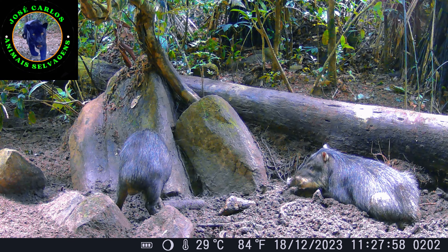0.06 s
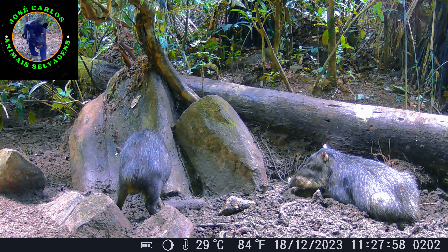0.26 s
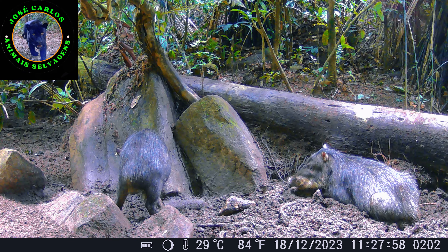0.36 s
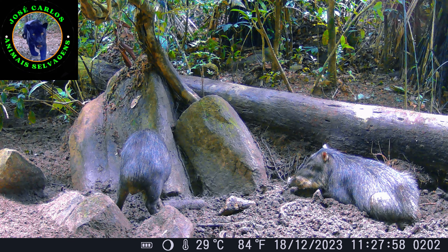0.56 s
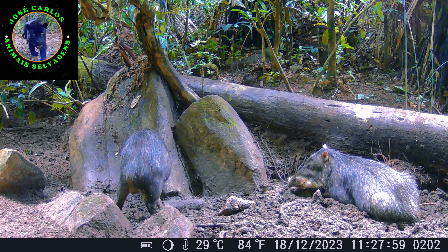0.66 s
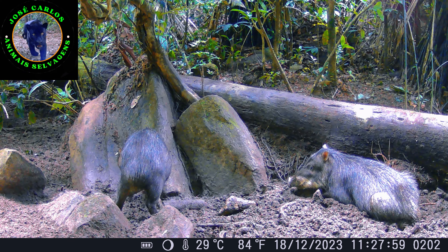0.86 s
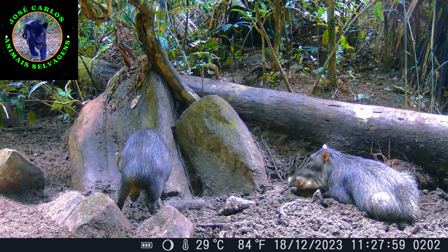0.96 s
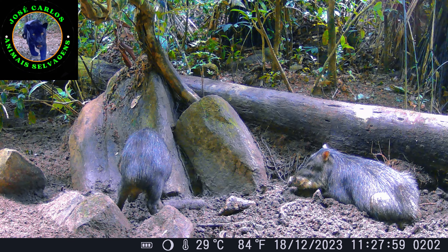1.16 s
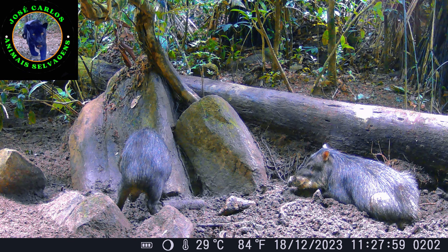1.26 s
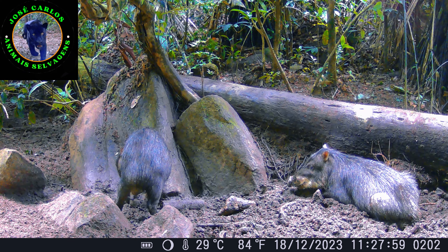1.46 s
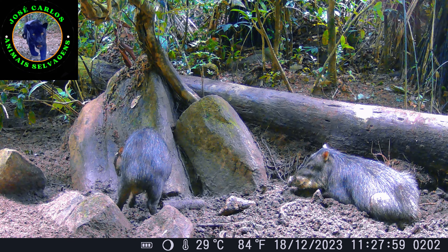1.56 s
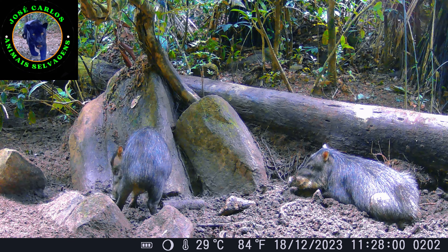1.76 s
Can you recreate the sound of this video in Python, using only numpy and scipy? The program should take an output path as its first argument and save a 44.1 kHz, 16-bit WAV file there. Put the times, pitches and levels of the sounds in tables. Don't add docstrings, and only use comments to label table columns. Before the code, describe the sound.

Peccary tusk clacks: a lighter one at 0.12 s, then a hard, hollow, briefly overloaded one at 0.17 s, scattered by trees into a fading echo. Leaf litter rustles faintly in the first 0.1 s. Low pulsing grunts and wet smacks continue, strongest smack near 1.19 s, more around 1.7. A bird's falling whistle repeats at 0.05, 0.63, 1.17 and 1.75 s, growing stronger, over faint pulsing insects and distant forest wash.

```python
import sys
import numpy as np
from scipy import signal
from scipy.fft import rfft, irfft
from scipy.io import wavfile
from scipy.ndimage import uniform_filter1d

SR = 44100
rng = np.random.default_rng(int(sys.argv[2]) if len(sys.argv) > 2 else 0)


def field_ratio(decibels):
    return 10 ** (np.asarray(decibels, dtype=float) / 20)


def transcribe(signal):
    frames = np.atleast_2d(signal).T
    limited = np.clip(frames, -1, 1)
    pcm = np.round(limited * 32767).astype(np.int16)
    wavfile.write(sys.argv[1], SR, pcm)


N = 79380


def read(points, hz):
    f, value = np.transpose(points)
    return np.interp(np.log(hz + 1), np.log(f + 1), value)


def evened(x):
    return x / np.sqrt(np.mean(x ** 2) + 1e-20)


def add(mix, start_s, sound):
    part = mix[round(start_s * SR):][:len(sound)]
    part += sound[:len(part)]


def drift(hz, size):
    low_pass = signal.butter(2, hz, fs=SR, output="sos")
    return evened(signal.sosfiltfilt(low_pass, rng.standard_normal(size), padtype="even"))


def resonate(x, hz, width_hz):
    turn = np.exp(2j * np.pi * np.cumsum(hz * np.ones(len(x))) / SR)
    r = np.exp(-np.pi * width_hz / SR)
    return 2 * (turn * signal.lfilter([1 - r], [1, -r], x / turn)).real


def coloured(points, x):
    hz = np.fft.rfftfreq(len(x), 1 / SR)
    return irfft(rfft(x) * field_ratio(read(points, hz)), len(x))


def fading_noise():
    # f/Hz, level/dB per Hz
    early_colour = [(59, -54), (100, -15), (555, 3), (694, -7), (1050, -2.5), (6990, -22.5), (8580, -14.5),
                    (11200, -54), (18900, -120)]
    level_db, length_s = -49, 0.1
    t = np.arange(N) / SR
    fade = np.cos(np.pi / 2 * np.clip(t / length_s, 0, 1))
    return field_ratio(level_db) * fade * evened(coloured(early_colour, rng.standard_normal(N)))


def wash():
    # f/Hz, level/dB per Hz
    far_forest = [(20, 0.5), (90, -6.5), (300, -12.5), (1500, -21.5), (2100, -22), (3300, -32.5),
                  (5100, -45.5), (6500, -34.5)]
    level_db, swell_db, patchy_db = -51, .6, 1.2
    frames, hz = N // 256 + 5, np.fft.rfftfreq(1024, 1 / SR)
    a, b, patches = rng.standard_normal((frames, 513, 3)).T
    patches = uniform_filter1d(patches, size=10, axis=0)
    patches = evened(uniform_filter1d(patches, size=12, axis=1))
    z = (a + 1j * b) * field_ratio(read(far_forest, hz)[:, None] + patchy_db * patches)
    noise = signal.istft(z, nperseg=1024, noverlap=768)[1][:N]
    return field_ratio(level_db + swell_db * drift(4.35, size=N)) * evened(noise)


def insects():
    # f/Hz, width/Hz, level/dB, clicks/per s
    chorus = [(7790, 730, -67.5, 2400), (5830, 460, -77, 530)]
    first_s, every_s, length_s = .08, .29, .19
    low_hz, high_hz, width_hz, buzz_db = 4280, 4720, 450, -73.5
    part = ((np.arange(N) / SR - first_s) % every_s) / length_s
    hz = low_hz + (high_hz - low_hz) * np.sqrt(np.clip(part, 0, 1))
    on = np.clip(np.minimum(part, 1 - part) / 0.12, 0, 1)
    scrape = rng.standard_normal(N) * field_ratio(0.92 * drift(250, size=N))
    buzz = resonate(resonate(scrape, hz, width_hz), hz, width_hz)
    out = field_ratio(buzz_db) * on * evened(buzz)
    for ring_hz, ring_width, db, rate in chorus:
        clicks = (rng.random(N) < rate / SR) * rng.standard_normal(N)
        clicks = clicks * field_ratio(1.9 * drift(40, size=N))
        out += field_ratio(db) * evened(resonate(resonate(clicks, ring_hz, ring_width), ring_hz, ring_width))
    return out


def smacks():
    # t/s, peak level/dB, f/Hz, width/Hz, t60/s (time to fall by 60 dB)
    licks = [(0.023, -47, 1100, 600, .015), (.076, -49, 980, 203, .04), (0.5378, -46.5, 1430, 402, .012),
             (.541, -49, 2600, 895, .01), (0.556, -49.5, 2330, 1210, .012), (.601, -45.5, 1380, 304, 0.017),
             (0.65, -42, 1620, 1010, 0.008), (.651, -44.5, 2250, 400, 0.042), (.649, -57, 3950, 704, 0.014),
             (.6675, -41, 1000, 600, 0.016), (.668, -53, 4040, 700, 0.027), (0.74, -44.5, 1300, 400, 0.022),
             (1.084, -59, 1900, 1010, 0.0074), (1.0887, -47.5, 1970, 500, 0.018),
             (1.1135, -49, 1550, 400, .02), (1.1173, -48.5, 1730, 400, 0.01),
             (1.134, -50, 1450, 700, 0.011), (1.138, -57, 1840, 298, 0.021),
             (1.1528, -47, 1540, 395, 0.018), (1.156, -45, 1760, 397, 0.015), (1.19, -35, 1500, 810, .014),
             (1.1891, -37.5, 965, 250, 0.025), (1.193, -35.5, 1820, 403, 0.018),
             (1.1902, -52, 3170, 800, .01), (1.313, -49.5, 1240, 200, 0.037),
             (1.65, -49.5, 3100, 700, 0.029), (1.7025, -47.5, 3410, 900, 0.045),
             (1.7012, -42, 1470, 1300, 0.052), (1.7341, -40, 1540, 800, 0.036),
             (1.7374, -43, 907, 350, 0.05), (1.739, -42.5, 2430, 1000, 0.031),
             (1.753, -46.5, 1650, 500, 0.034)]
    snap, lips_rise, lips_s = 10, .2, .006
    out, t = np.zeros(N), np.arange(2205) / SR
    wet = rng.standard_normal((len(licks), len(t)))
    climb = 1 + lips_rise * (np.minimum(t / lips_s, 1) - .5)
    first_contact = snap * (np.arange(len(t)) == 10)
    for noise, (start, db, hz, width, t60) in zip(wet, licks):
        sound = noise * field_ratio(-60 * t / max(t60, .004)) * np.minimum(t / 0.00035, 1) + first_contact
        for share in (.5, 1, 2):
            sound = resonate(sound, hz * climb, share * width)
        add(out, start, field_ratio(db) * sound / abs(sound).max())
    return out


def bird():
    # start t/s, length/s, level/dB, top f/Hz
    whistles = [
        (.05, .3, -59, 2290),
        (.625, .3, -56.5, 2333),
        (1.172, .3, -54, 2382),
        (1.745, .3, -50.5, 2415),
    ]
    # f/Hz, level/dB
    voice = [(1850, -12), (1945, -11), (1990, -2), (2065, -7), (2120, -1), (2170, 3), (2215, -5),
             (2330, -5), (2450, -8)]
    rise_s, fade_share, waver_db = .03, .15, 2.4
    fall_hz_per_s, wet_db, blur_t60 = 1740, -4, .7
    out, t = np.zeros(N), np.arange(SR // 2) / SR
    waver = field_ratio(waver_db * drift(46, size=N))
    for start, length, db, top_hz in whistles:
        part = np.clip(t / length, 0, 1)
        swell = np.minimum(t / rise_s, 1) * np.clip((1 - part) / fade_share, 0, 1)
        swell = swell * field_ratio(db + read(voice, top_hz - fall_hz_per_s * t))
        turns = (top_hz - fall_hz_per_s * t / 2) * t
        add(out, start, np.sqrt(2) * swell * np.sin(2 * np.pi * turns))
    blur = rng.standard_normal(len(t)) * field_ratio(-60 * t / blur_t60)
    blurred = signal.fftconvolve(out, blur / np.linalg.norm(blur))[:N]
    return out * waver + field_ratio(wet_db) * blurred


def grunts():
    # start t/s, length/s, level/dB, pulses/per s, throat f/Hz
    calls = [(0.062, 0.061, -49, 75, 210), (0.455, 0.08, -47.5, 66, 396), (0.713, 0.048, -49.5, 140, 505),
             (0.749, 0.039, -51.5, 58, 323), (0.775, 0.029, -53, 75, 178), (0.403, 0.092, -57.5, 100, 310),
             (0.519, 0.037, -54, 71, 250), (0.903, 0.029, -59, 90, 208), (1.193, 0.032, -50.5, 85, 209),
             (1.327, 0.023, -56, 102, 205), (1.455, 0.039, -53, 80, 135), (1.694, 0.052, -48, 96, 211)]
    breath, jitter, uneven_db = .2, .07, 8.5
    throat_width, chest_hz, chest_width, snout_hz = 173, 94, 29, 626
    chest_db, chest_tilt_db = 0, -7.5
    out, size = np.zeros(N), 4410
    t = np.arange(size) / SR
    fade = np.clip((t[-1] - t) * 50, 0, 1)
    snout = signal.butter(4, snout_hz, fs=SR, output="sos")
    for start, length, db, rate_hz, throat_hz in calls:
        turns = .5 + np.cumsum(rate_hz * (1 + jitter * drift(80, size=size))) / SR
        pulses = np.diff(np.floor(turns), prepend=0) * field_ratio(uneven_db * drift(64, size=size))
        pulses = (1 - breath) * evened(pulses) + breath * rng.standard_normal(size)
        pulses *= np.sin(np.pi * np.clip(t / length, 0, 1))
        throat = resonate(resonate(pulses, throat_hz, 2 * throat_width), throat_hz, throat_width)
        throat = signal.sosfilt(snout, throat)
        chest = resonate(resonate(pulses, chest_hz, chest_width), chest_hz, 2 * chest_width)
        chest_gain = field_ratio(chest_db + chest_tilt_db * np.log2(throat_hz / 200))
        voice = evened(throat) + chest_gain * evened(chest)
        add(out, start, field_ratio(db) * np.sqrt(length * 10) * fade * voice)
    return out


def clack(modes, crack_db):
    polarity = [-1, 1, 1, -1, -1, 1, 1, -1, 1, 1, -1, 1, -1, 1, -1, -1, 1, -1, 1]
    # f/Hz, level/dB
    crack_colour = [(300, -24), (900, -13), (1700, -5), (2600, 0), (3700, -5), (4300, -13), (5200, -13),
                    (8000, -15)]
    tusk_hz, slide_s, crack_t60 = 1600, 0.00045, 0.061
    t = np.arange(SR // 4) / SR
    slide = 1 - np.exp(-(t / slide_s) ** 2)
    ring = np.zeros(len(t))
    for (hz, db, t60), sign in zip(modes, polarity):
        build = slide if hz > tusk_hz else 1
        ring += sign * field_ratio(db - 60 * t / t60) * np.sin(2 * np.pi * hz * t) * build
    crack = evened(coloured(crack_colour, rng.standard_normal(len(t))))
    return ring + slide * field_ratio(crack_db - 60 * t / crack_t60) * crack


def woods(x, colour):
    # f/Hz, t60/s
    band_t60 = [(200, 0.41), (550, 0.06), (1200, 0.43), (2300, 0.42), (3500, 0.34), (6000, 0.44),
                (8500, 0.13)]
    far_db, far_t60, build_s = -12.5, 1.02, 0.0052
    hz, t, z = signal.stft(rng.standard_normal(SR), SR, nperseg=256)
    t60 = read(band_t60, hz)[:, None]
    decay = np.hypot(field_ratio(-60 * t / t60), field_ratio(far_db - 60 * t / far_t60))
    z = z * field_ratio(read(colour, hz)[:, None]) * decay / np.sqrt(t60 * SR / 14)
    tail = signal.istft(z, SR, nperseg=256)[1]
    build = np.clip(np.arange(len(tail)) / SR / build_s, 0, 1) ** 2
    return signal.fftconvolve(x, tail * build)[:N]


def clacks():
    times = [
        .1187,
        .1703,
    ]
    scatter_db = [-29.5, -15]
    # f/Hz, level/dB, t60/s
    mouth_light = [(496, -11.7, .074), (583, -13.2, .052), (538, -18.2, .09)]
    mouth_hard = [(515, -1.4, .044), (582, -.9, .051), (530, -24, .12)]
    # f/Hz, level/dB, t60/s
    skull_light = [(250, -26, 0.034), (345, -29, 0.046), (920, -21.5, 0.02)]
    skull_hard = [(247, -17.5, 0.029), (344, -25, 0.067), (807, -11, 0.017)]
    # f/Hz, level/dB, t60/s
    jaw_light = [(1100, -24, 0.027), (1550, -30, 0.043), (2130, -11, .015), (2463, -29, 0.065),
                 (3240, -39, 0.022), (3650, -28, .02), (5900, -32.5, 0.0087), (7300, -40.5, 0.01),
                 (1867, -34, 0.066), (2250, -10.5, 0.011), (3340, -22, 0.016), (3080, -23.5, 0.06),
                 (90, -30, .02)]
    jaw_hard = [(1070, -12, 0.03), (1535, -24.5, 0.055), (2284, -6, 0.023), (2413, -19, 0.066),
                (3500, -9, 0.02), (3940, -21, 0.045), (5840, -17, 0.01), (7250, -21, 0.0061),
                (1955, -34, 0.022), (2070, -11.5, 0.0067), (3300, -22, .03), (2993, -20.5, 0.028),
                (68.6, -34, 0.087)]
    # f/Hz, level/dB
    echo = [(200, -17), (550, -31), (1200, -18), (2150, -13), (2500, -19), (3500, -20), (6000, -18.5),
            (8500, -20.5)]
    scatter = [(200, -35), (800, -30), (1500, -22.5), (2200, -28), (3400, -13.5), (4300, -29), (5200, -40),
               (7500, -34.5)]
    direct_db = -.8
    ringing, blows = np.zeros(N), np.zeros(N)
    add(ringing, times[0], clack(mouth_light + skull_light + jaw_light, crack_db=-35.5))
    add(ringing, times[1], clack(mouth_hard + skull_hard + jaw_hard, crack_db=-15.5))
    blows[np.round(np.multiply(times, SR)).astype(int)] = field_ratio(np.add(scatter_db, 40))
    return field_ratio(direct_db) * ringing + woods(ringing, echo) + woods(blows, scatter)


def scene():
    return (fading_noise() + wash() + insects() + smacks() + bird() + grunts() + clacks())[None]


def top_cut(x):
    return signal.sosfilt(signal.butter(12, 15720, fs=SR, output="sos"), x)


def record(dry):
    edge_hz, edge_width_hz, hiss_db = 8400, 1300, -84.5
    hz = np.fft.rfftfreq(2 * N, 1 / SR)
    edge = np.cos(np.pi / 2 * np.clip((hz - edge_hz) / edge_width_hz + .5, 0, 1)) ** 2
    padded = np.concatenate([dry, dry[:, ::-1]], axis=1)
    narrow = irfft(rfft(padded) * edge, 2 * N)[:, :N]
    mix = narrow + field_ratio(hiss_db) * rng.standard_normal((1, N))
    return top_cut(np.clip(mix, -1, 1))


dry = scene()
out = record(dry)
transcribe(out)
```